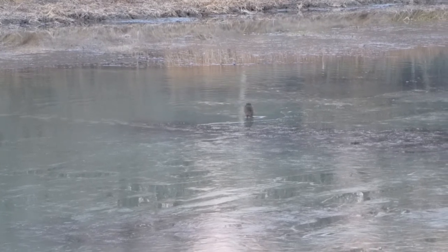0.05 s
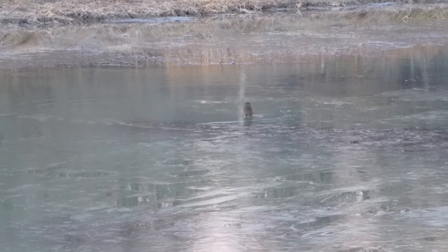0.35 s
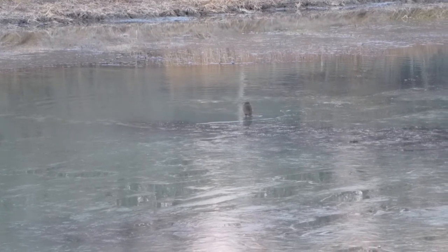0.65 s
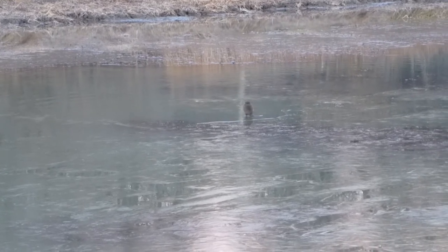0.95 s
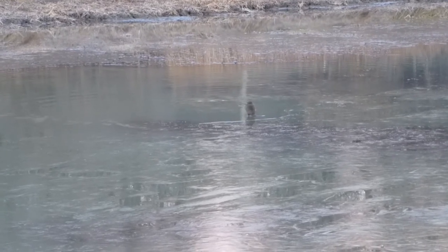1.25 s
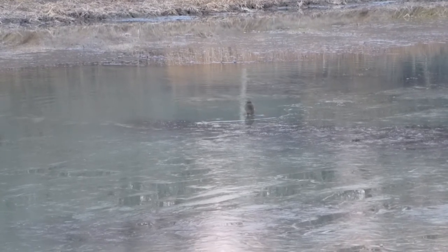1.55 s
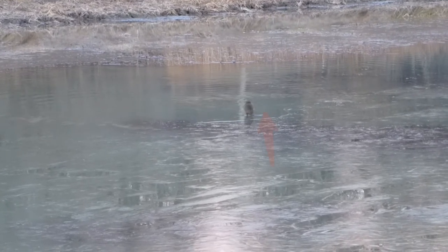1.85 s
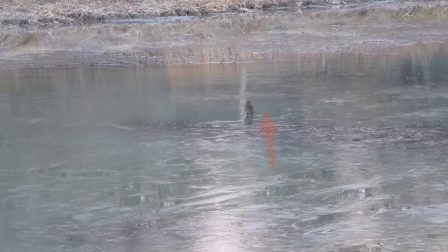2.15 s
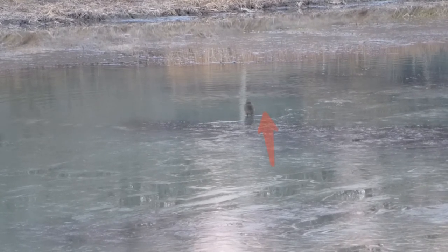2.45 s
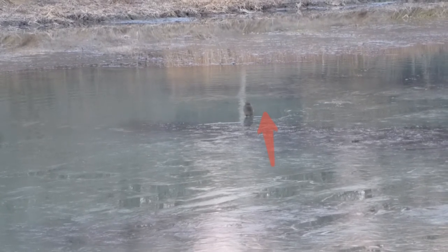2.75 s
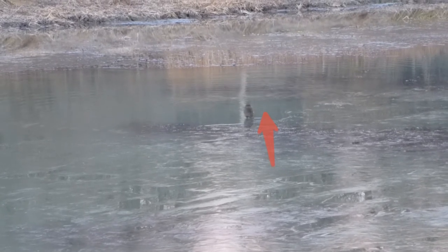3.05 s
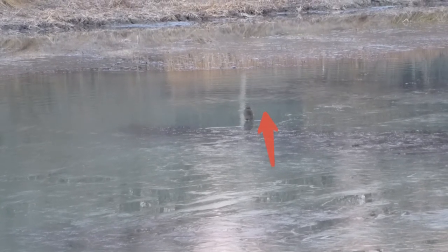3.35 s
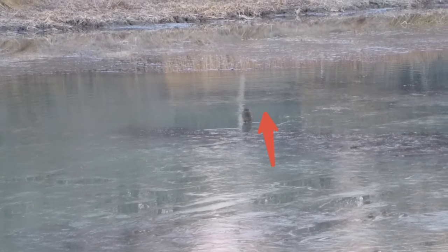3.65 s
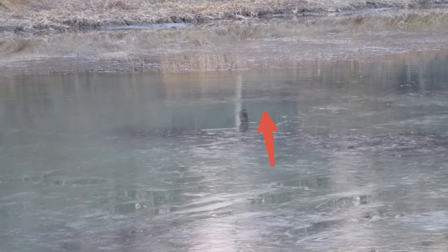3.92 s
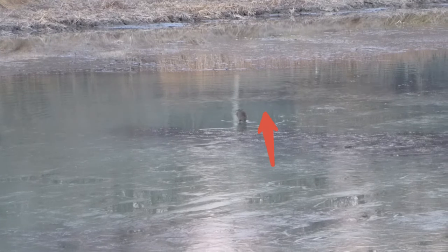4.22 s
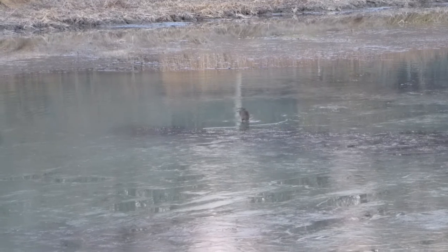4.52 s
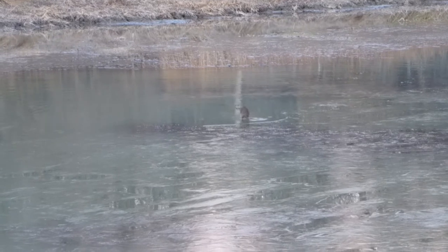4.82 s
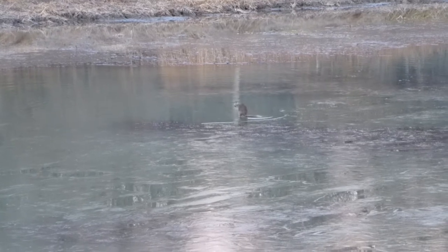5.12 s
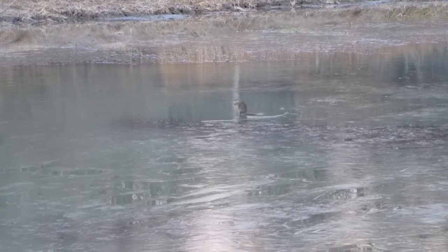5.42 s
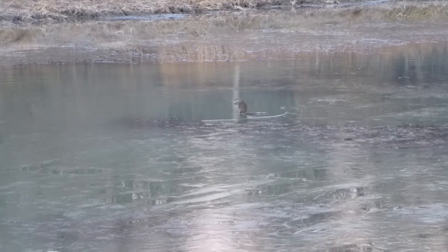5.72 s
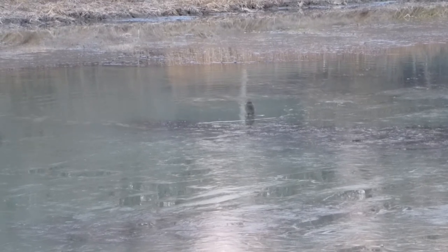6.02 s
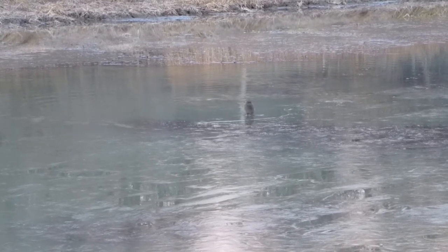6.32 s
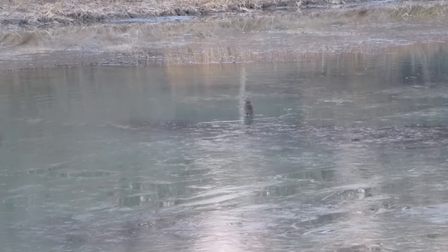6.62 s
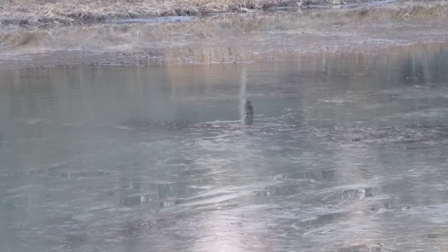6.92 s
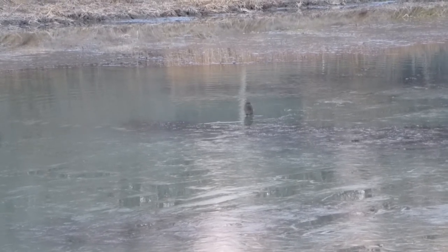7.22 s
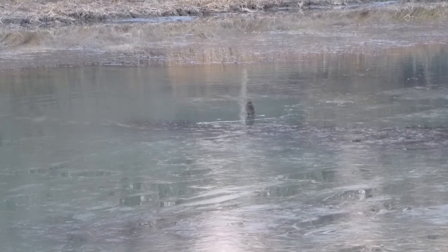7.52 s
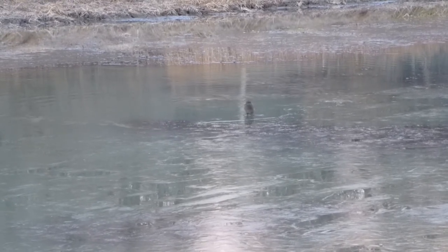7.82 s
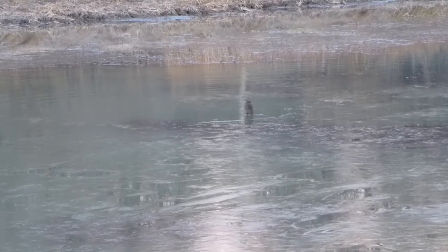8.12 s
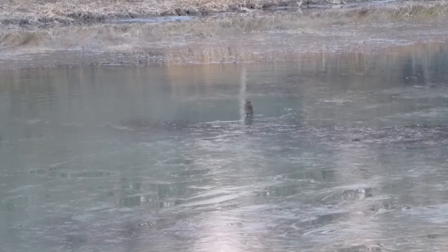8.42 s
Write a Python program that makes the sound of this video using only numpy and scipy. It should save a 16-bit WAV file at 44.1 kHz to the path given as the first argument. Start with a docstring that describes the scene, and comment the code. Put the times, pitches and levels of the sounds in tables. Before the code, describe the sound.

Three very short, glassy clicks of thin ice cracking over a steady airy hiss and low outdoor rumble.

```python
"""A steady airy hiss over a low outdoor rumble and a faint electronic whine, on a frozen pond.
The hiss dips briefly six times, swells gently twice and once turns hollow; one far tick barely shows.
Out front, the same short, glassy click sounds three times. Each is a crack that splinters through
thin ice, sets the sheet ringing briefly and comes back from the bank with a faint tail."""
import sys
import numpy as np
from scipy import signal
from scipy.fft import rfft, irfft
from scipy.io import wavfile
from scipy.ndimage import uniform_filter1d

SR = 44100
rng = np.random.default_rng(int(sys.argv[2]) if len(sys.argv) > 2 else 0)


def wav_record(signal):
    """Record a signal, one row per channel, as 16-bit PCM in the file named by sys.argv[1]."""
    frames = np.transpose(np.atleast_2d(signal))
    bounded = np.clip(frames, -1, 1)
    # unit amplitude maps onto the largest positive 16-bit level
    quanta = np.round(bounded * 32767).astype(np.int16)
    wavfile.write(sys.argv[1], SR, quanta)


N = 377496
LEAD_S, CLICK_S = .03, .5  # a click's pre-roll before the crack, and its whole length


def gain_of(db):
    """Decibels to amplitude."""
    return 10 ** (np.asarray(db) / 20)


def unit_rms(x):
    """Scales to rms 1."""
    return x / np.sqrt(np.mean(x ** 2) + 1e-20)


def eq_curve(points, hz):
    """Gain at each frequency, from (Hz, dB) points joined on a log-frequency axis."""
    point_hz, db = np.transpose(points)
    return gain_of(np.interp(np.log(hz + 1), np.log(point_hz + 1), db))


def shaped_noise(envelope, spectrum, level_db):
    """Coloured noise under an envelope; level_db is its rms where the envelope is 1."""
    phases = np.exp(2j * np.pi * rng.random(len(spectrum)))
    sound = envelope * unit_rms(irfft(spectrum * phases, len(envelope)))
    return gain_of(level_db) * sound * np.linalg.norm(envelope) / np.linalg.norm(sound)


# Tone of the air bed. Each row: frequency in Hz, relative level in dB.
AIR_EQ = [(15, -91), (32, -80.5), (80, -79.5), (120, -92), (155, -90.5), (250, -101), (320, -92),
          (490, -97), (740, -87.5), (1300, -90), (2700, -91), (4100, -89.5), (5600, -91), (8000, -89),
          (12000, -95), (15600, -98)]
# Its stereo width. Each row: frequency in Hz, side level against mid in dB.
AIR_WIDTH = [(60, -36), (200, -47), (700, -37), (1290, -26), (2400, -18), (4400, -16), (15000, -15)]

def air(level_db=-49.5):
    """Even hiss over a rumble; the bass sits in the centre, the treble is slightly wide."""
    hz = np.fft.rfftfreq(N, 1 / SR)
    mid, side = rfft(rng.standard_normal((2, N))) * eq_curve(AIR_EQ, hz)
    mid = irfft(mid, N)
    side = irfft(side * eq_curve(AIR_WIDTH, hz), N)
    return gain_of(level_db) * np.array([mid + side, mid - side]) / mid.std()


# Swells of the distant rush. Each row: crest in seconds, boost in dB.
RUSH_SWELLS = [(2.92, 2.2), (5.4, 1.5)]

def swell_rush(hiss, centre_hz=950, width_hz=300, half_s=0.24):
    """The distant rush in the midrange of the hiss rises and settles gently."""
    t, hz = np.arange(N) / SR, np.fft.rfftfreq(N, 1 / SR)
    rush = irfft(rfft(hiss) * np.exp(-((hz - centre_hz) / width_hz) ** 2), N)
    boost_db = sum(db * np.exp(-((t - crest_s) / half_s) ** 2) for crest_s, db in RUSH_SWELLS)
    return hiss + rush * (gain_of(boost_db) - 1)


# Bands left standing in the hollow hiss. Each entry: centre in Hz.
HOLLOW_BANDS = [730, 1850, 2950, 3450, 4180, 5000, 5340, 5860, 7060, 7490, 8300, 9600]

def turn_hollow(hiss, at_s=3.281, half_s=.012, half_band_hz=70, kept_db=3, lost_db=-13,
                keep_bass_below_hz=150):
    """For a moment the hiss thins out to a few narrow bands while the low rumble carries on."""
    t, hz = np.arange(N) / SR, np.fft.rfftfreq(N, 1 / SR)
    kept = abs(hz - np.array(HOLLOW_BANDS)[:, None]).min(0) < half_band_hz
    comb_db = np.where(kept, kept_db, lost_db) * (hz > keep_bass_below_hz)
    thin = irfft(rfft(hiss) * gain_of(comb_db), N)
    blend = np.exp(-((t - at_s) / half_s) ** 2)
    return hiss + blend * (thin - hiss)


# Tones of the whine. Each row: pitch in Hz, rms level in dB.
WHINE_TONES = [(4000, -81), (15477, -79), (15624, -71)]

def whine(waver_hz=2.5):
    """Thin electronic tones that waver a little, all together."""
    drift_hz = waver_hz * unit_rms(uniform_filter1d(rng.standard_normal(N), size=2000))
    return sum(gain_of(db) * np.sqrt(2) * np.sin(2 * np.pi * np.cumsum(hz + drift_hz) / SR)
               for hz, db in WHINE_TONES)


# Dips in the bed. Each entry: deepest point in seconds.
DIP_TIMES = [1.1502, 2.0, 2.644, 5.8071, 6.65, 7.3011]

def dips(depth_db=18, recover_s=0.0068, fall_s=0.0004, curve=1.25):
    """A gain that ducks at once and is back within a hundredth of a second or two."""
    age = np.arange(N) / SR - np.array(DIP_TIMES)[:, None]
    duck = np.exp(-np.maximum(age / recover_s, -age / fall_s) ** curve)
    return gain_of(-depth_db * duck.sum(0))


def far_tick(at_s=4.4713, level_db=-45.5, pitch_hz=2250, half_s=.0013, sag_hz_per_s=200000):
    """A soft tap, barely above the hiss; its way through the ice makes it fall in pitch."""
    t = np.arange(N) / SR - at_s
    turns = pitch_hz * t - sag_hz_per_s * t ** 2 / 2
    envelope = np.exp(-.5 * (t / half_s) ** 2)
    return gain_of(level_db) * envelope * np.sin(2 * np.pi * turns)


def reflections(t, hz, eq, delay_s, level_db, rise_s, t60):
    """A cloud of small reflections that swells up to its delay, then dies by 60 dB in t60 seconds."""
    attack = np.exp(np.minimum(t - delay_s, 0) / rise_s)
    decay = gain_of(-60 * np.maximum(t - delay_s, 0) / t60)
    return shaped_noise(attack * decay, eq_curve(eq, hz), level_db)


# Tone of the reverb tail. Each row: frequency in Hz, relative level in dB.
TAIL_EQ = [(1200, -19), (2200, -14), (4200, -11), (5400, -13), (6900, -7.5), (8000, -1.5), (9100, 0),
           (10400, -2.5), (11900, -5), (13200, -12), (15500, -16)]

def shore_tail(t, hz):
    """The grass returns a faint, bright wash; the far shore a softer, longer one."""
    grass = reflections(t, hz, TAIL_EQ, delay_s=0.03, level_db=-42.7, rise_s=0.008, t60=0.25)
    shore = reflections(t, hz, TAIL_EQ, delay_s=0.029, level_db=-47.0, rise_s=0.013, t60=0.63)
    return grass + shore


# Tone of the bank's echo. Each row: frequency in Hz, relative level in dB.
BANK_EQ = [(1800, -48), (2600, -24), (6300, -21), (7500, -20), (8600, -9), (9600, -9), (11300, -14),
           (12600, -21), (15000, -32)]

def bank_echo(t, hz):
    """The crack comes back off the bank as one tight slap."""
    return reflections(t, hz, BANK_EQ, delay_s=0.0272, level_db=-31.5, rise_s=0.0022, t60=0.026)


# Tone of the scatter in the ice. Each row: frequency in Hz, relative level in dB.
SHEET_EQ = [(1600, -50), (2300, -23), (4200, -28), (5500, -10), (6900, -2), (7900, 8), (9100, -6),
            (10400, -5), (11800, -2), (13000, -19), (15500, -26)]

def sheet_scatter(t, hz):
    """Sound scattered inside the ice sheet leaves a short sizzle right behind the crack."""
    return reflections(t, hz, SHEET_EQ, delay_s=0.0011, level_db=-33, rise_s=0.00069, t60=0.095)


# Knocks after the crack. Each row: delay in seconds, level in dB.
KNOCK_HITS = [(.0003, -43.5), (.0066, -39.5), (.0136, -47.5)]
# Tone of a knock. Each row: frequency in Hz, relative level in dB.
KNOCK_EQ = [(1500, -32), (2100, 5.5), (3500, 3), (4300, 15), (4800, -7), (6000, -16), (7500, -22)]

def knocks(t, hz):
    """Dull knocks follow the crack a few thousandths of a second apart."""
    return sum(reflections(t, hz, KNOCK_EQ, delay_s, level_db, rise_s=0.00031, t60=0.018)
               for delay_s, level_db in KNOCK_HITS)


def splinters(t, hz):
    """A narrow squeak in two steps; bright splintering then swells, snaps and trails past the crack."""
    def grit(at_s, db, centre_hz, width_hz, rise_s, fall_s):
        """A band of fine splintering that swells up to its moment and dies away."""
        envelope = np.exp(-np.where(t < at_s, ((at_s - t) / rise_s) ** 2, (t - at_s) / fall_s))
        band = np.exp(-2 * ((hz - centre_hz) / width_hz) ** 2)
        return shaped_noise(envelope, band, db)

    creep = grit(at_s=-0.0075, db=-42.5, centre_hz=7900, width_hz=1400, rise_s=0.005, fall_s=0.0012)
    squeak = grit(at_s=-0.004, db=-31.5, centre_hz=7550, width_hz=1300, rise_s=0.0007, fall_s=0.0018)
    swell = grit(at_s=-0.0005, db=-25, centre_hz=10300, width_hz=3800, rise_s=0.0015, fall_s=0.0005)
    snap = grit(at_s=-0.0005, db=-22.5, centre_hz=12200, width_hz=3200, rise_s=0.0002, fall_s=0.00025)
    trail = grit(at_s=0.0011, db=-36.0, centre_hz=11400, width_hz=5600, rise_s=0.0005, fall_s=0.006)
    return creep + squeak + swell + snap + trail


# Modes of the ice. Each row: pitch in Hz, relative level in dB, seconds to fade by 60 dB.
ICE_MODES = [(2290, -62, .05), (2880, -60, .05), (4130, -55, .05), (4320, -55, .05), (5220, -52.5, .05),
             (7662, -44, .055), (7842, -41, .055), (8117, -42, .05), (8413, -29.5, .055),
             (8632, -38.5, .045), (8752, -38, .045), (8894, -30, .044), (9112, -32, .042), (9526, -29, .04),
             (9651, -35, .038), (10106, -34, .036), (10288, -35, .036), (10593, -38, .036),
             (11350, -41, .028), (12400, -44, .024), (14150, -48, .03)]

def ice_ring(t, boost_db=4.6, rise_s=0.00019):
    """The crack starts close, high modes all at once; they drift apart and beat as they die."""
    age = np.maximum(t, 0)
    modes = sum(gain_of(db - 60 * age / t60) * np.cos(2 * np.pi * hz * age) for hz, db, t60 in ICE_MODES)
    return gain_of(boost_db) * modes * (1 - np.exp(-age / rise_s))


# Tone of the crack. Each row: frequency in Hz, relative level in dB.
CRACK_EQ = [(1500, -64), (2100, -52), (2800, -42), (3600, -37), (4200, -28), (4750, -33), (5300, -27),
            (6000, -33), (7400, -14), (8100, -3), (8900, 1), (10000, -3.5), (11500, -12), (12400, -16),
            (13100, -24), (15000, -24), (15600, -28)]

def crack(t, hz, peak_db=-9, sweep_s=0.0005, centre_hz=9100, width_hz=1300):
    """The transient, a tiny rising chirp: the low side of its main band lands just before the high."""
    lag_turns = sweep_s * width_hz * (1 - np.exp(-.5 * ((hz - centre_hz) / width_hz) ** 2))
    spectrum = eq_curve(CRACK_EQ, hz) * np.exp(-2j * np.pi * (hz * LEAD_S + lag_turns))
    pulse = irfft(spectrum, len(t))
    return gain_of(peak_db) * pulse / abs(pulse).max()


def ice_click():
    """One glassy click: the thin ice cracks and rings, and the surroundings answer."""
    size = round(CLICK_S * SR)
    t = np.arange(size) / SR - LEAD_S  # zero at the crack
    hz = np.fft.rfftfreq(size, 1 / SR)
    ice = crack(t, hz) + ice_ring(t) + splinters(t, hz) + knocks(t, hz) + sheet_scatter(t, hz)
    return ice + bank_echo(t, hz) + shore_tail(t, hz)


# Cues for the click. Each entry: peak in seconds.
CLICK_TIMES = [1.4001, 6.05708, 7.55108]

def scene():
    """The same click, dead centre, three times over the bed of air and whine."""
    bed = turn_hollow(swell_rush(air())) + whine()
    mix = bed * dips() + far_tick()
    click = ice_click()
    for peak_s in CLICK_TIMES:
        start = round((peak_s - LEAD_S) * SR)
        mix[:, start:start + len(click)] += click
    return mix


def record(dry, cutoff_hz=15760):
    """A steep low-pass trims the very top of the mix."""
    taps = signal.firwin(511, cutoff_hz, window=("kaiser", 9), fs=SR)
    return signal.oaconvolve(dry, taps[None], "same", axes=1)


dry = scene()
out = record(dry)
wav_record(out)
```